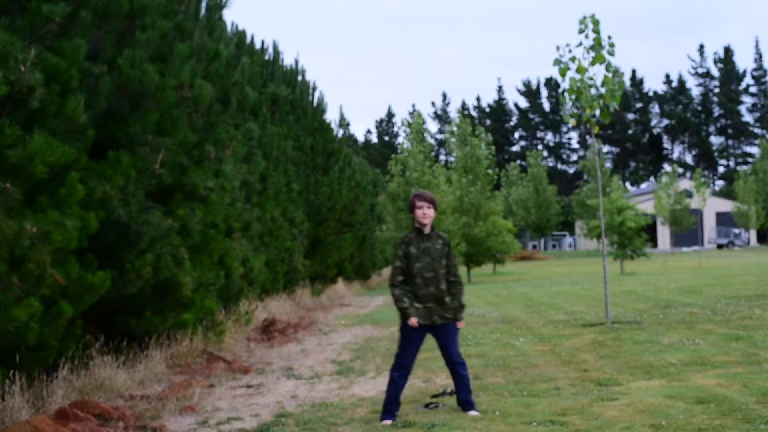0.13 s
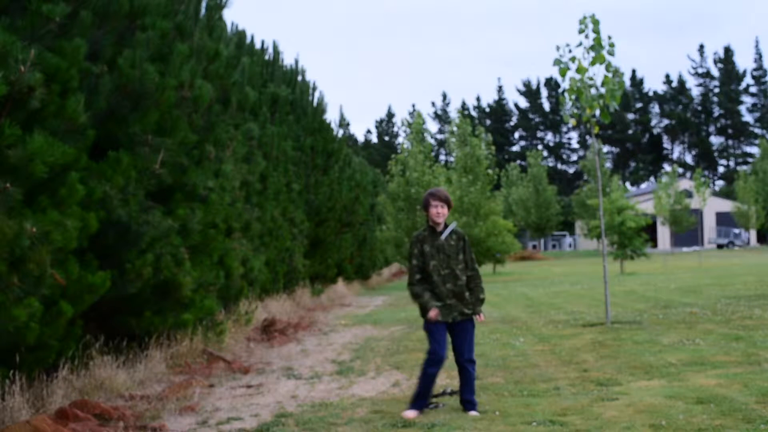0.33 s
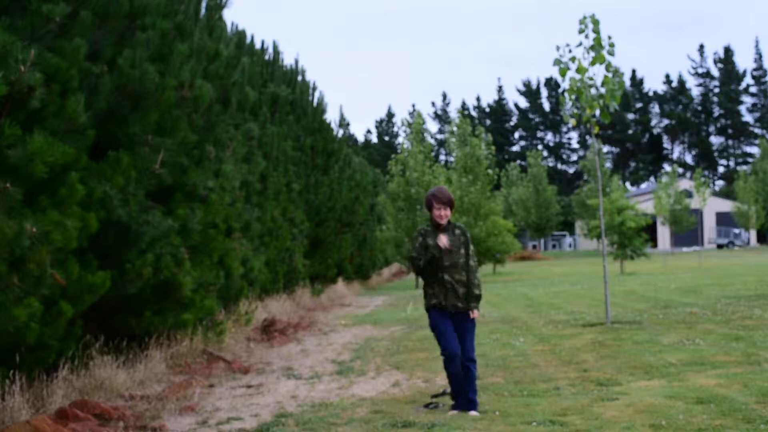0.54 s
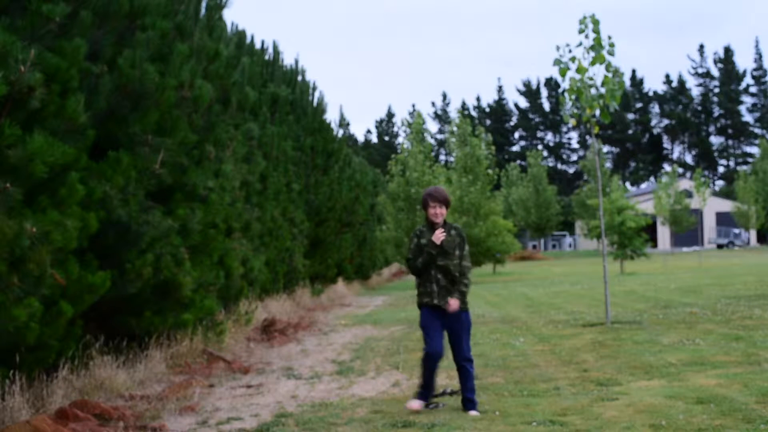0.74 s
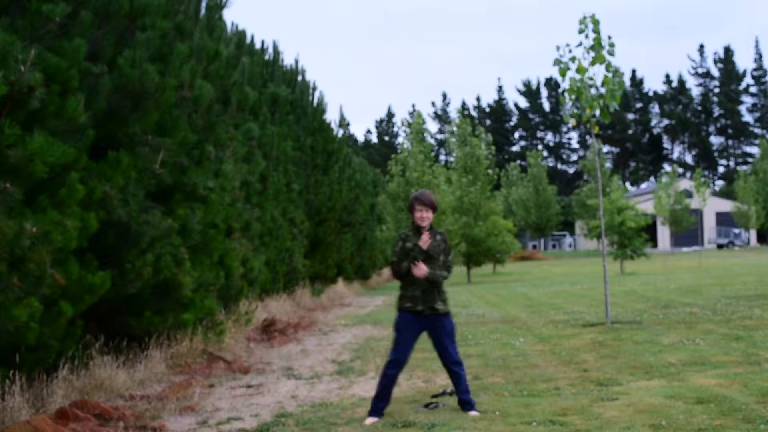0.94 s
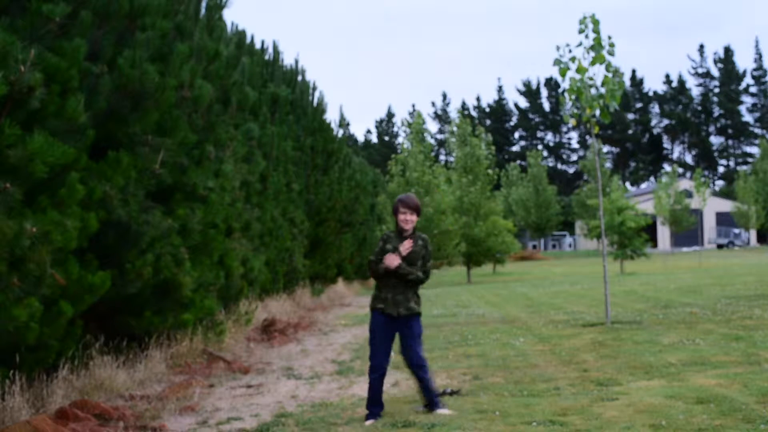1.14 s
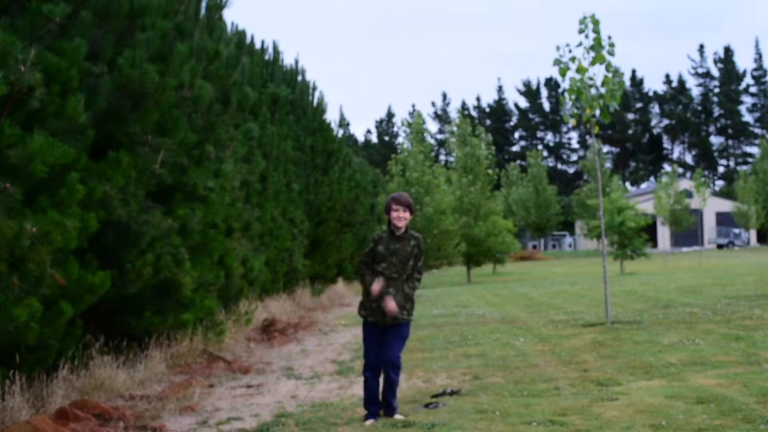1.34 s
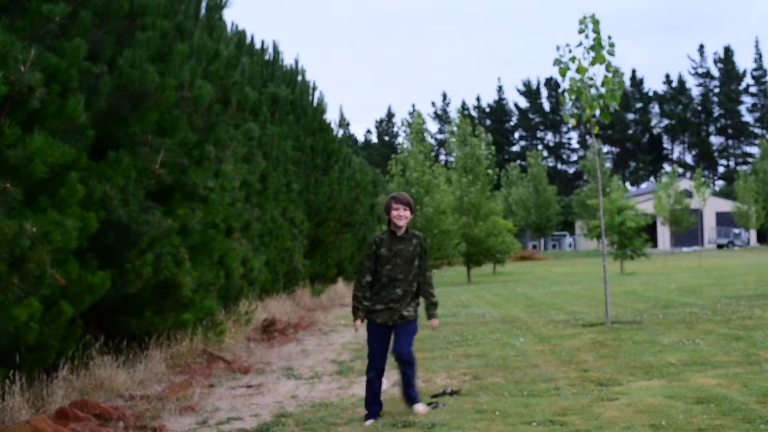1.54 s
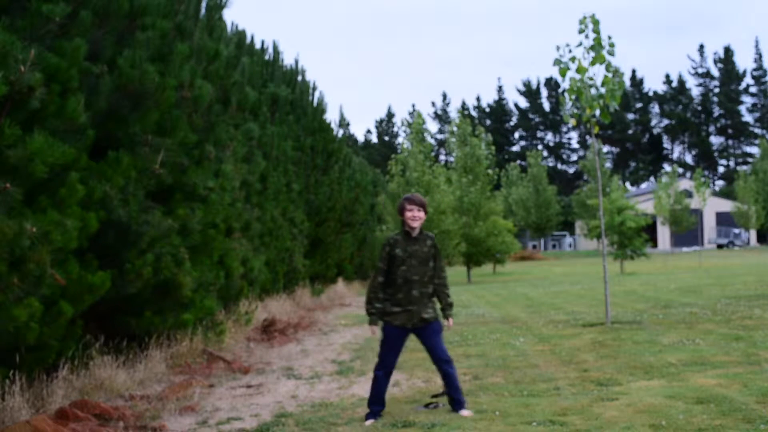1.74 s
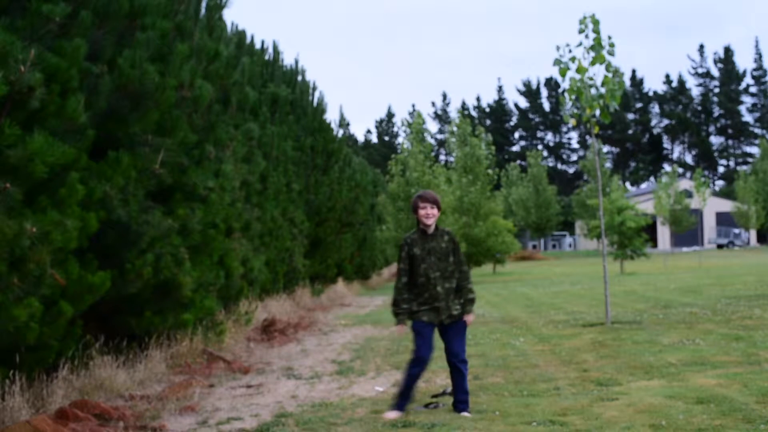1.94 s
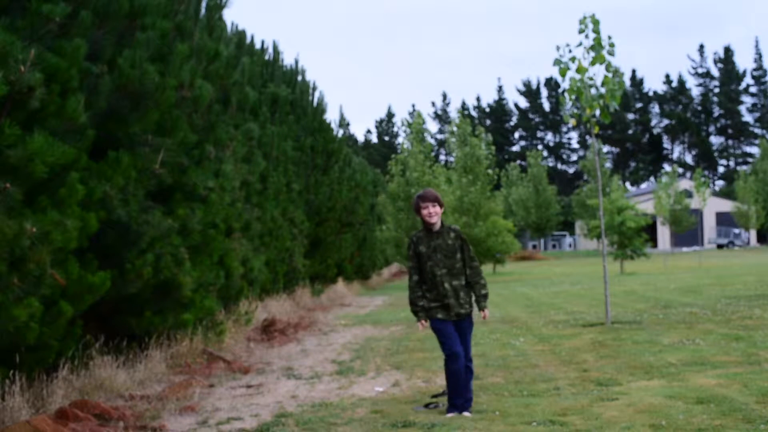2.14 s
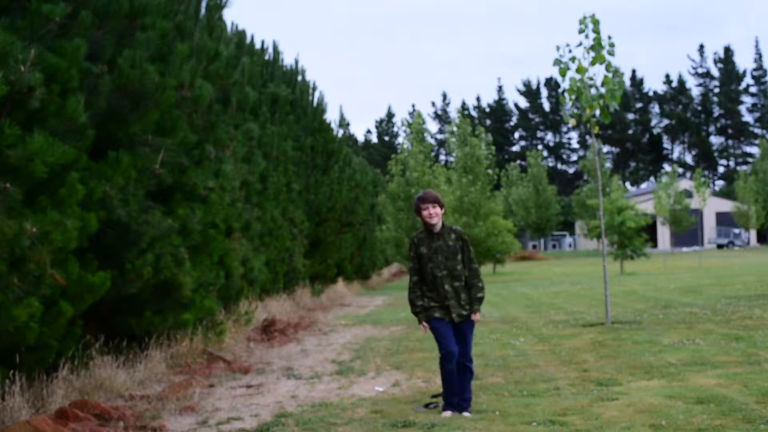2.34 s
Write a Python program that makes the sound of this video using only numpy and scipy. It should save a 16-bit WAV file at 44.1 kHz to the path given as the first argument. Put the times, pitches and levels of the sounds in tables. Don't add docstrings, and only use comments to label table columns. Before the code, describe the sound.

Close to the microphone, a toy blaster's plunger slams with a sharp hollow plastic crack and brief outdoor echo. Fingers bump the shell, then the slide rasps, latches and returns, over quiet birds, breeze and distant engine hum.

```python
import sys
import numpy as np
from scipy import signal
from scipy.fft import rfft, irfft
from scipy.io import wavfile

SR = 44100
rng = np.random.default_rng(int(sys.argv[2]) if len(sys.argv) > 2 else 0)


def linear_from_db(decibels):
    return 10 ** (np.asarray(decibels, float) / 20)


def transcribe(signal):
    frames = np.atleast_2d(signal).T
    limited = np.clip(frames, -1, 1)
    pcm = np.round(limited * 32767).astype(np.int16)
    wavfile.write(sys.argv[1], SR, pcm)


N = 105840

# pitch in Hz, level in dB per Hz.
SLIDE_RATTLE = [(710, -15.5), (1200, -4.5), (2990, -6), (5820, -6.5), (7540, -8), (8950, -13.5),
                (14500, -18), (15600, -29)]
# pitch in Hz, width in Hz, level in dB.
HELD_SHELL = [(312, 25, -2), (457, 67, -3.5), (615, 72, 3), (685, 140, -1), (990, 27, -2), (1400, 180, -13)]


def rms_one(x):
    return x / np.sqrt(np.mean(x ** 2) + 1e-20)


def shaped(x, points):
    hz = np.maximum(np.fft.rfftfreq(N, 1 / SR), 1)
    f, db = np.transpose(points)
    octaves_outside = np.log2(np.maximum(np.maximum(f[0] / hz, hz / f[-1]), 1))
    gain_db = np.interp(np.log(hz), np.log(f), db) - 18 * octaves_outside
    return irfft(rfft(x) * linear_from_db(gain_db), N)


def resonance(x, hz, width):
    r = np.exp(-np.pi * width / SR)
    feedback = [1, -2 * r * np.cos(2 * np.pi * hz / SR), r * r]
    return signal.lfilter(np.array([1, 0, -1]) * (1 - r * r) / 2, feedback, x)


def drift(rate):
    knots = rng.standard_normal(N // 64)
    return np.interp(np.arange(N) / SR * rate, np.arange(len(knots)), knots)


def curve(rows):
    s, db = np.transpose(rows)
    return linear_from_db(np.interp(np.arange(N) / SR, s, db, -120, -120))


def grains():
    grains_per_s, spread_db = 16000, 1.7
    size = linear_from_db(spread_db * np.minimum(rng.exponential(1, N), 3)) * rng.choice([-1, 1], N)
    return rms_one(size * (rng.random(N) < grains_per_s / SR))


def shell(x, body):
    out = 0
    for k, (hz, width, db) in enumerate(body):
        out = out + resonance(x, hz, 2.8 * width) * linear_from_db(db) * (-1) ** k
    return out


def contacts(rows, body, edge, attack_s, strike_db, rub=0):
    t = np.arange(N) / SR
    touch = grains()
    rattle = rms_one(shaped(grains(), edge))
    low, high = rub * touch, rub * rattle
    body_grain_db, edge_q = -6, 3.5
    for s, db, share_db, hz, t60 in rows:
        u = np.maximum(t - s, 0)
        shape = np.minimum(u / attack_s, 1) * linear_from_db(db - 60 * np.maximum(u - attack_s, 0) / t60)
        blow = (np.arange(N) == int((s + attack_s / 2) * SR)) * linear_from_db(db + strike_db)
        low = low + (shape * touch * linear_from_db(body_grain_db) + blow) * linear_from_db(share_db / 2)
        burst = shape * rattle * linear_from_db(-share_db / 2)
        high = high + 0.54 * burst + resonance(burst, hz, hz / edge_q)
    return shell(low, body) / np.std(shell(touch, body)) + high


def shot():
    # start in seconds, level in dB, low-body share in dB, edge pitch in Hz,
    # time to fall 60 dB in seconds.
    shot_contacts = [
        (.2218, -14, -5.5, 2240, 0.05),
        (.2270, -12, -1.5, 4460, 0.02),
        (.2281, -5, 17, 4700, 0.024),
        (.2325, -5, 0.5, 2700, 0.023),
        (.2370, -22, 4, 6500, 0.01),
        (.2400, -23, 6.5, 1400, 0.0078),
        (.2432, -16.5, -7.5, 2330, 0.019),
        (.2450, -21, -7.5, 4400, 0.048),
        (.2480, -29.5, 4, 1500, 0.028),
        (.2610, -30, -5, 4300, 0.027),
    ]
    # pitch in Hz, width in Hz, level in dB.
    shot_body = [(305, 91, -11.5), (431.7, 50, -3), (680, 45, 2.5), (860, 44, 1), (1057, 44, 2),
                 (1380, 54, 2.5), (1560, 50, 3), (1750, 25, -2), (2247, 89, -6.5), (2463, 34, -4.5),
                 (3126, 56, -10)]
    # pitch in Hz, level in dB per Hz.
    shot_edge = [(900, -18), (1600, -5.5), (2500, 0.5), (3200, -4), (4500, -0.5), (6350, -1.5),
                 (9000, -5.5), (15600, -18.5)]
    return contacts(shot_contacts, shot_body, shot_edge, 0.0008, 15.5)


def thump():
    # start in seconds, pitch in Hz, level in dB, time to fall 60 dB in seconds.
    pushes = [(.227, 194.2, -14.5, 0.052), (.232, 108, -33.5, 0.2), (0.229, 32, -34, .08),
              (0.2284, 954, -2.5, 0.023), (.2330, 461, -11.5, 0.037), (0.308, 338, -51, 0.037),
              (1.032, 648, -36, 0.046), (1.073, 580, -37.5, 0.043), (1.337, 1050, -37, 0.019),
              (2.027, 2650, -15.5, .012), (2.1353, 1950, -21.5, 0.033), (2.331, 1400, -36.5, .03),
              (2.131, 680, -22.5, 0.045), (2.142, 673, -27, 0.031), (2.3835, 845, -28.5, 0.034),
              (2.3935, 750, -20, 0.025)]
    rise_cycles = 0.33
    out = 0
    for s, hz, db, t60 in pushes:
        u = np.maximum(np.arange(N) / SR - s, 0)
        rise = 1 - np.exp(-u * hz / rise_cycles)
        out = out + linear_from_db(db - 60 * u / t60) * rise * np.sin(2 * np.pi * hz * u)
    return out


def rail(rub):
    hz, width_hz, level_db, fades_at_s = 2450, 1000, 2.5, 2.1
    ring = rms_one(resonance(resonance(grains(), hz, width_hz), hz, width_hz))
    fade = 1 / (1 + np.exp(np.clip((np.arange(N) / SR - fades_at_s) / 0.0041, -20, 20)))
    return linear_from_db(level_db) * rub * ring * fade


def slide():
    # start in seconds, level in dB, low-body share in dB, edge pitch in Hz,
    # time to fall 60 dB in seconds.
    slide_contacts = [(2.0265, -35.5, -10, 2520, 0.022), (2.0220, -36, -15.5, 9250, 0.024),
                      (2.0310, -44.5, -15, 7500, 0.019), (2.0405, -29, -12, 6500, 0.02),
                      (2.0560, -33.5, -13, 5560, 0.025), (2.0680, -32, 2, 5530, 0.028),
                      (2.0825, -30, -11, 6850, 0.028), (2.0990, -46, -13, 6000, 0.07),
                      (2.1100, -40, 3, 6300, 0.042), (2.1190, -29, -4.5, 3930, 0.06),
                      (2.1250, -26.5, -6, 8900, 0.024), (2.1296, -16.5, -14, 5720, 0.02),
                      (2.1345, -30.5, 5.5, 2650, 0.077), (2.1500, -46.5, -6, 2000, 0.36),
                      (2.3160, -53, -5, 5400, 0.049), (2.3260, -39, -11, 4300, 0.024),
                      (2.3280, -35.5, -13.5, 2450, 0.025), (2.3770, -36.5, -5.5, 2044, 0.032),
                      (2.3815, -32.5, -2.5, 2130, 0.094), (2.3860, -44, -7.5, 6920, 0.026),
                      (2.3925, -34, 8.5, 6540, 0.071)]
    # pitch in Hz, width in Hz, level in dB.
    slide_body = [(325.9, 35, -4.5), (482, 64, -1), (672, 70, 1.5), (810, 41, 0), (1020, 53, -1.5),
                  (1425, 33, -1), (1890, 45, -3.5)]
    # time in seconds, level in dB.
    friction = [(2.0072, -52), (2.0085, -43.5), (2.030, -34.5), (2.070, -44), (2.080, -52), (2.097, -50.5),
                (2.125, -44), (2.140, -56)]
    rub = curve(friction) * linear_from_db(1.5 * drift(160))
    return contacts(slide_contacts, slide_body, SLIDE_RATTLE, 0.0007, 15.5, rub) + rail(rub)


def handling():
    # start in seconds, level in dB, low-body share in dB, edge pitch in Hz, time to fall 60 dB in
    # seconds. The first row is a low echo of the shot.
    knocks = [(.308, -45, 14, 1209, 0.038), (.951, -59.5, 24.5, 2510, 0.057),
              (.979, -50.5, 21, 1527, 0.066), (0.991, -57, 20, 1490, 0.084), (1.032, -43, 12.5, 1800, 0.05),
              (1.074, -46.5, 17.5, 2000, 0.047), (1.311, -42, 7.5, 2320, 0.035),
              (1.324, -53, -1, 3174, 0.042), (1.336, -50.5, -3, 4720, 0.038),
              (1.86, -49.5, 2.5, 2514, 0.074), (1.902, -50, 4, 5450, 0.11), (1.924, -47, -1.5, 2420, 0.06),
              (1.934, -47, 5.5, 2640, 0.033), (1.95, -57.5, 3, 2520, 0.037)]
    # pitch in Hz, level in dB per Hz.
    grip_edge = [(710, -24), (1200, -4), (3000, -6), (5800, -9.5), (7500, -14), (9000, -20.5), (15600, -34)]
    # time in seconds, level in dB.
    fingers = [(.89, -66), (.96, -61.5), (1.09, -65.5), (1.12, -77.5), (1.3, -82), (1.32, -58.5),
               (1.36, -61.5), (1.39, -85.5)]
    rub = curve(fingers) * linear_from_db(drift(60))
    return contacts(knocks, HELD_SHELL, grip_edge, 0.0018, 4.9, rub)


def loose_parts():
    # start in seconds, level in dB, low-body share in dB, edge pitch in Hz,
    # time to fall 60 dB in seconds.
    ticks = [(.9043, -54, -3, 5460, .012), (.912, -56.5, -8, 9040, 0.011),
             (.9187, -44.5, -7.5, 7000, 0.011), (.9801, -56.5, -10, 6300, 0.013),
             (1.031, -49, -9.5, 8500, 0.013), (1.0734, -50, -4.5, 6620, 0.014),
             (1.091, -54.5, -4, 9000, .012), (1.311, -51.5, -13.5, 7050, 0.019)]
    return contacts(ticks, HELD_SHELL, SLIDE_RATTLE, 0.00059, 6.3)


def field(x):
    # delay in seconds, smear in seconds, level in dB, lowest Hz, highest Hz.
    echoes = [
        (0.0049, 0.024, -20.5, 760, 15300),
        (.052, 0.02, -30, 2800, 13500),
        (0.07, .06, -48, 1200, 9000),
        (0.251, 0.016, -59, 660, 2000),
        (.07, .05, -46, 250, 2700),
    ]
    t, response = np.arange(SR // 2) / SR, 0
    for lag, smear, db, low_hz, high_hz in echoes:
        band = signal.butter(2, [low_hz, high_hz], "band", fs=SR, output="sos")
        noise = signal.sosfilt(band, rng.standard_normal(len(t)))
        cloud = noise * np.exp(-0.5 * ((t - lag) / smear) ** 2)
        response = response + linear_from_db(db) * cloud / np.sqrt(np.sum(cloud ** 2))
    scatter_hz = 500
    return signal.fftconvolve(x * rms_one(drift(scatter_hz)), response)[:N]


def birds():
    # start in seconds, level in dB.
    chirps = [(-.044, -50), (1.425, -51)]
    # time in seconds, pitch in Hz, level in dB.
    note_up = [(.003, 3650, -8), (.012, 3800, -3), (.018, 4200, -6), (.025, 4800, -9), (.036, 5150, -10)]
    note_fall = [(.029, 4000, -8), (.033, 3720, -1), (.043, 3650, 0), (.048, 3300, -2), (.058, 3050, -6)]
    note_down = [(.070, 3050, -8), (.075, 3250, -2), (.089, 3220, 0), (.094, 3600, -5), (.098, 3050, -3),
                 (.109, 3020, 0), (.116, 2650, -13)]
    # middle in seconds, pitch in Hz, level in dB.
    peeps = [(0.647, 4500, -58.5), (0.66, 3270, -63.5), (.87, 3387, -60), (1.105, 4280, -59),
             (1.655, 3850, -62), (1.69, 3166, -54), (1.73, 3200, -61), (.6, 3700, -63), (.715, 3900, -62.5)]
    trill_hz, trill_depth_hz, sag_hz_per_s = 350, 130, 12000
    t, out = np.arange(N) / SR, np.zeros(N)
    for s, db in chirps:
        for note in (note_up, note_fall, note_down):
            u, hz, level = np.transpose(note)
            pitch = np.interp(t - s, u, hz) + trill_depth_hz * drift(trill_hz)
            husky_db = np.interp(t - s, u, level, -80, -80) + 4.7 * drift(160)
            out += linear_from_db(db + husky_db) * np.sin(2 * np.pi * np.cumsum(pitch) / SR)
    for s, hz, db in peeps:
        pitch = hz - sag_hz_per_s * np.clip(t - s, -0.1, 0.1) + trill_depth_hz * drift(trill_hz)
        swell = np.exp(-((t - s) / 0.013) ** 2)
        out += linear_from_db(db) * swell * np.sin(2 * np.pi * np.cumsum(pitch) / SR)
    leaves = rng.standard_normal(SR // 5) * linear_from_db(-60 * np.arange(SR // 5) / SR / 0.094)
    return out + signal.fftconvolve(out, leaves / np.sqrt(np.sum(leaves ** 2)))[:N]


def flock():
    # pitch in Hz, width in Hz, level in dB.
    registers = [(3200, 350, 1), (3750, 400, -1), (4500, 600, -6)]
    # time in seconds, level in dB.
    chatter = [(0, -51.5), (.2, -60.5), (.4, -63.5), (.65, -55.5), (.8, -63), (1.2, -59), (1.4, -62),
               (1.7, -59.5), (2.4, -62.5)]
    out = 0
    for hz, width, db in registers:
        band = rms_one(resonance(resonance(rng.standard_normal(N), hz, width), hz, width))
        out = out + band * linear_from_db(db - 13.5 + 1.4 * drift(35) + 0.97 * drift(1.1))
    return out * curve(chatter)


def needles():
    # time in seconds, level in dB.
    breeze = [(0, -69.5), (.35, -69), (.5, -61), (.7, -66), (1.12, -65.5), (1.25, -62), (1.6, -66.5),
              (1.8, -61), (1.98, -62), (2.25, -66), (2.4, -54)]
    # pitch in Hz, level in dB per Hz.
    rustle = [(1800, -3), (4000, 0), (6000, -4), (9000, -8), (13000, -15.5)]
    return curve(breeze) * rms_one(shaped(rng.standard_normal(N), rustle))


def engine():
    # pitch in Hz, width in Hz, level in dB, share of load.
    tones = [(53, 4.7, -70.5, 0), (108, 9.3, -67, -1), (161, 8, -64.5, 0.83), (290, 51, -68.5, -1.2)]
    # time in seconds, load in dB.
    load = [(0, 0.5), (.5, -3), (1.0, -3), (1.2, 1.5), (1.5, 4), (1.9, 2.5), (2.4, 2)]
    out = 0
    for hz, width, db, share in tones:
        tone = np.sin(2 * np.pi * np.cumsum(hz + 0.37 * width * drift(9.8)) / SR)
        out = out + linear_from_db(db + 0.5 + 2.9 * drift(25)) * curve(load) ** share * tone
    return out


def air():
    # pitch in Hz, level in dB per Hz.
    air_colour = [(40, -21.5), (130, -3), (230, -9.5), (400, -10.5), (900, -12), (1600, -23.5), (5000, -31),
                  (15600, -29)]
    # pitch in Hz, level in dB per Hz.
    side_colour = [(40, -5), (110, 1.5), (600, -4.5), (9000, -7.5), (15600, -5)]
    mid = linear_from_db(-59 + 0.8 * drift(1)) * rms_one(shaped(rng.standard_normal(N), air_colour))
    side = linear_from_db(-66.5) * rms_one(shaped(rng.standard_normal(N), side_colour))
    return mid + side * [[1], [-1]]


def scene():
    blaster = shot() + thump() + slide() + handling() + loose_parts()
    leak = linear_from_db(-35.5) * np.diff(np.roll(blaster, 5), prepend=0) * [[1], [-1]]
    return blaster + leak + field(blaster) + birds() + flock() + needles() + engine() + air()


def low_pass(x):
    return signal.sosfilt(signal.butter(12, 15800, fs=SR, output="sos"), x)


def record(dry):
    bass_cut = signal.butter(2, 35, "high", fs=SR, output="sos")
    x = np.clip(signal.sosfilt(bass_cut, dry), -1, 1)
    top_cut = signal.cheby2(8, 40, 16800, fs=SR, output="sos")
    return low_pass(signal.sosfiltfilt(top_cut, x))


dry = scene()
out = record(dry)
transcribe(out)
```